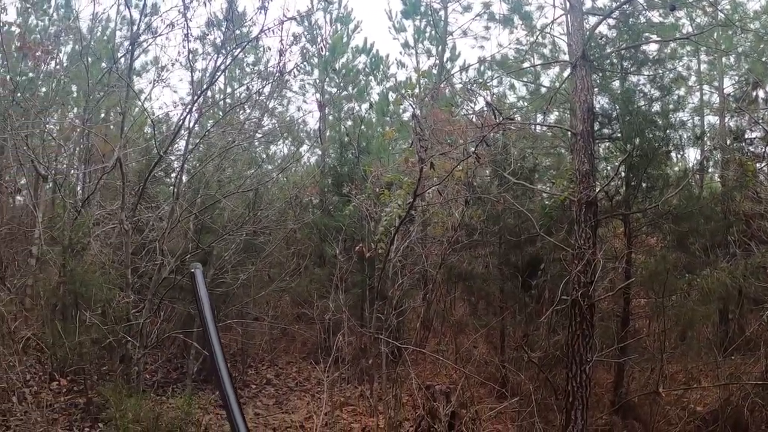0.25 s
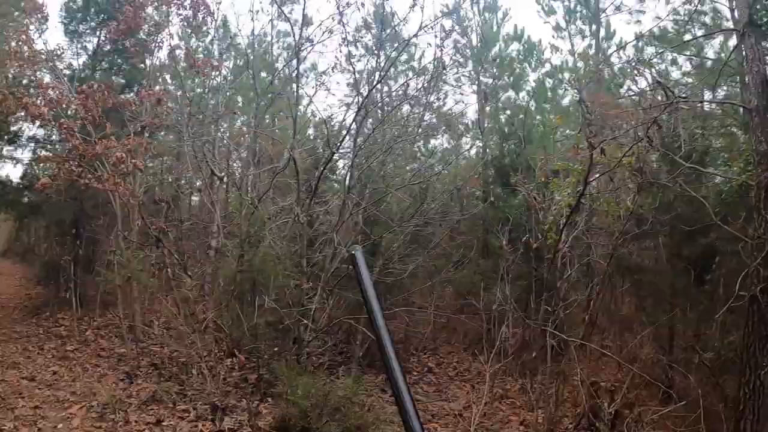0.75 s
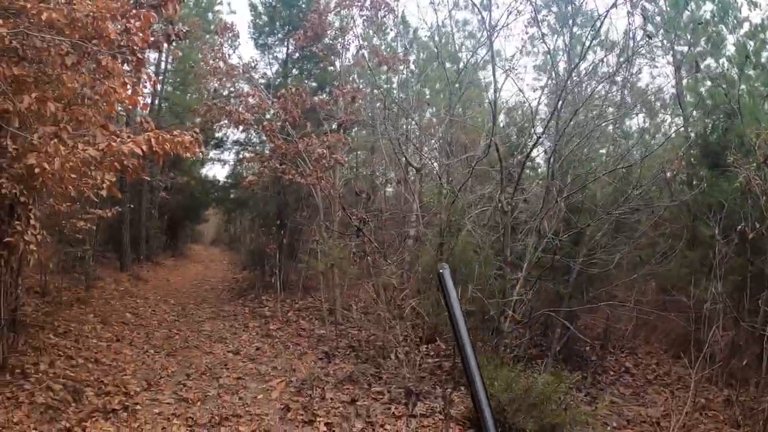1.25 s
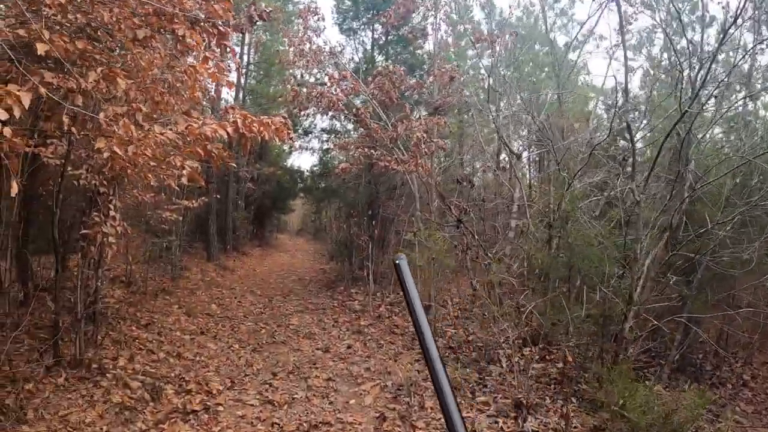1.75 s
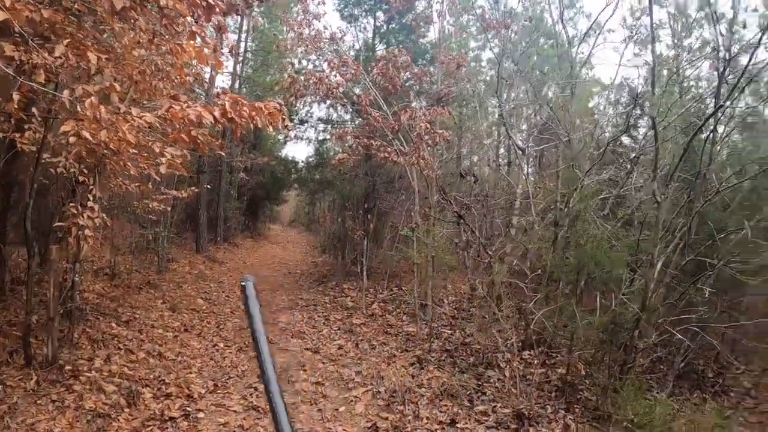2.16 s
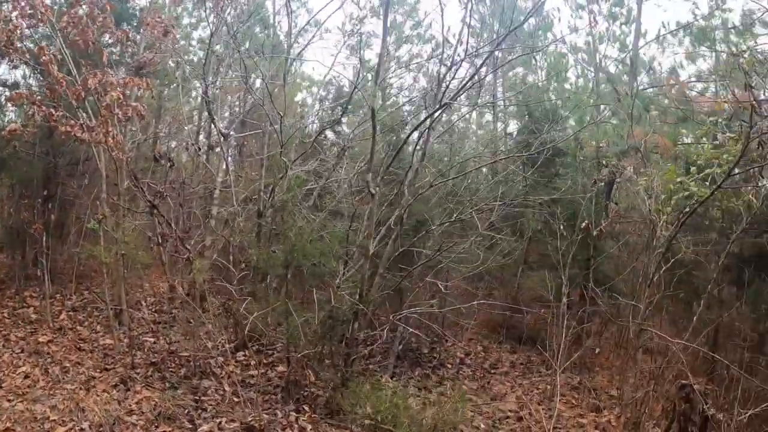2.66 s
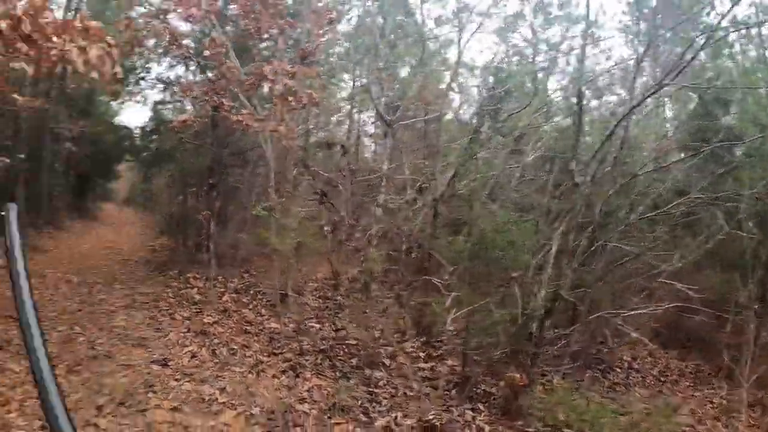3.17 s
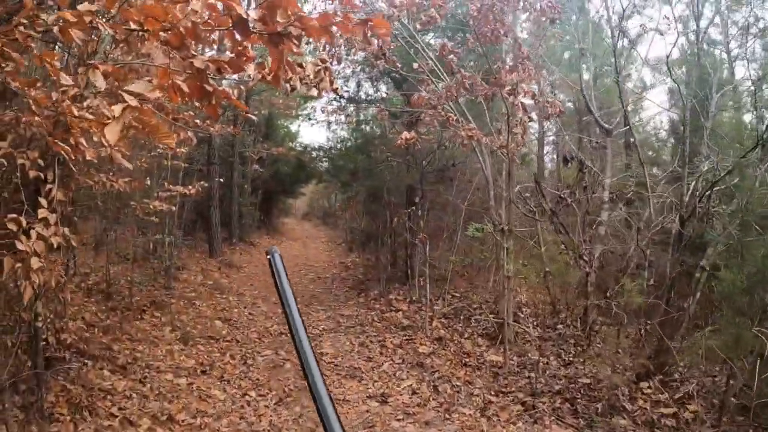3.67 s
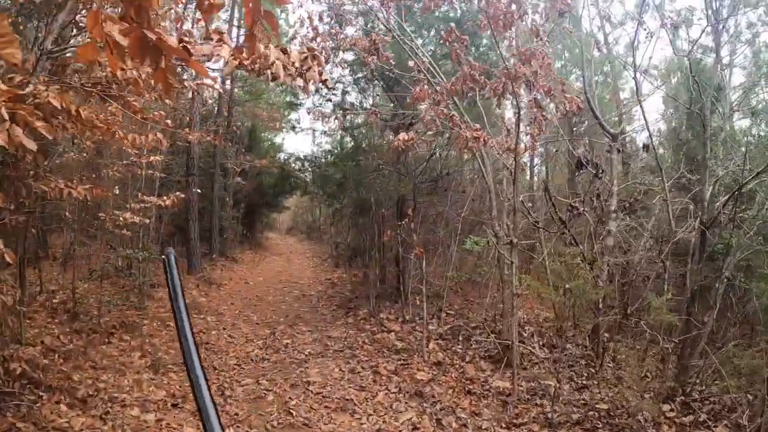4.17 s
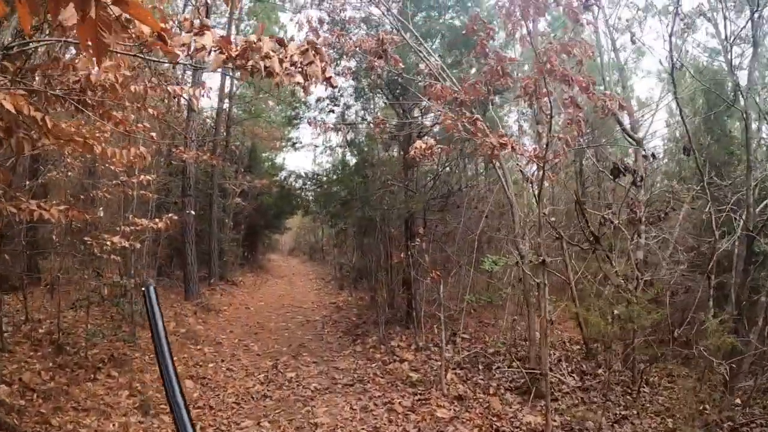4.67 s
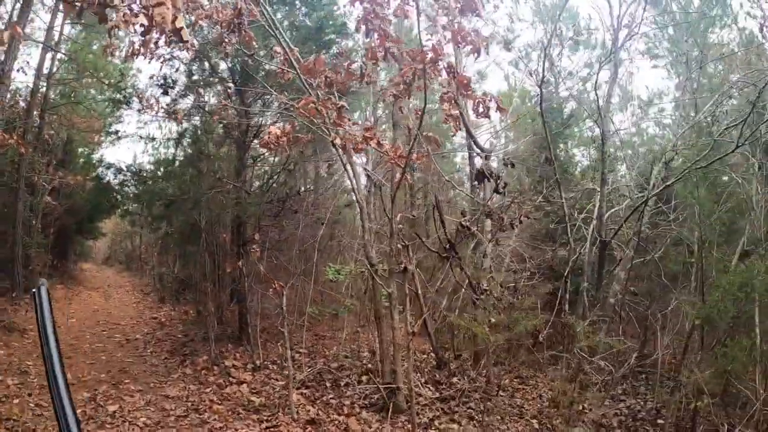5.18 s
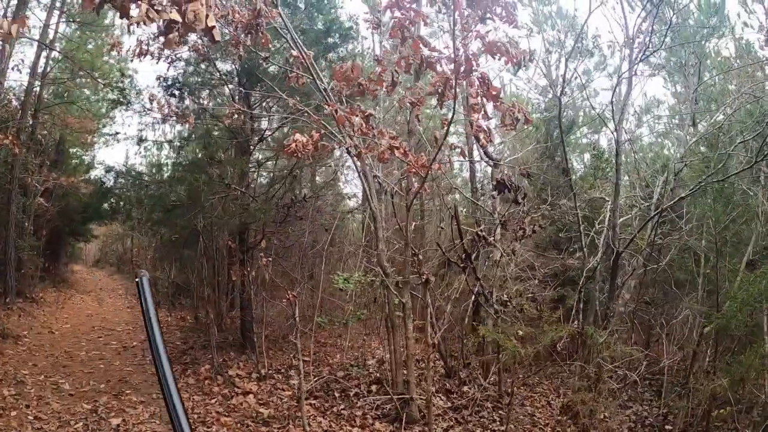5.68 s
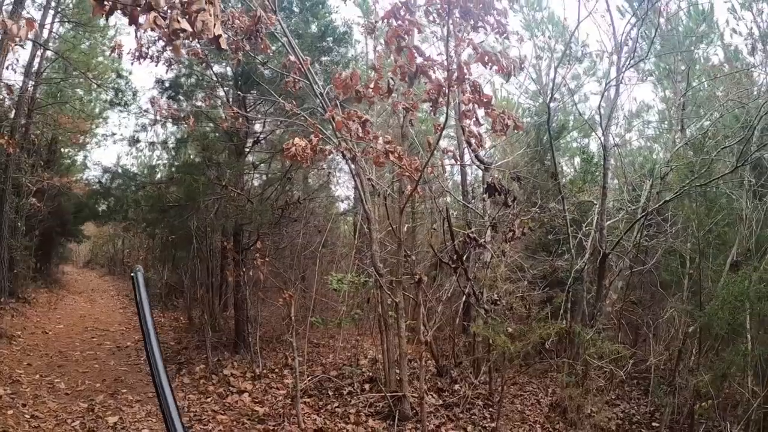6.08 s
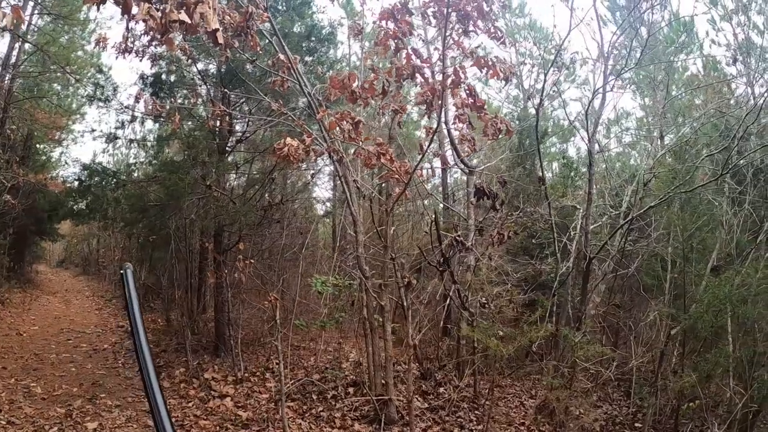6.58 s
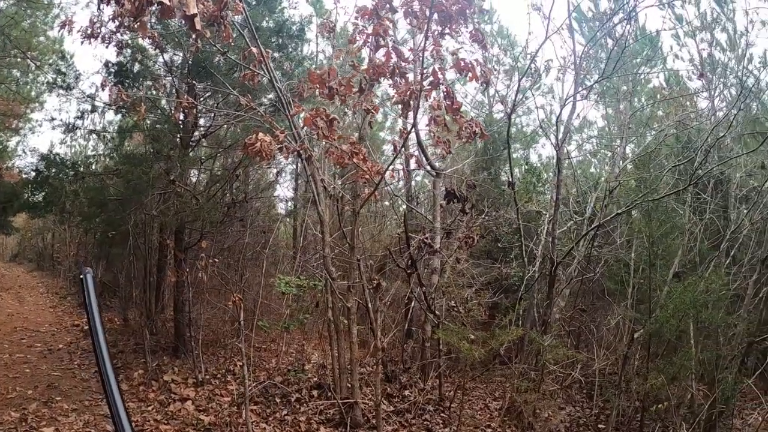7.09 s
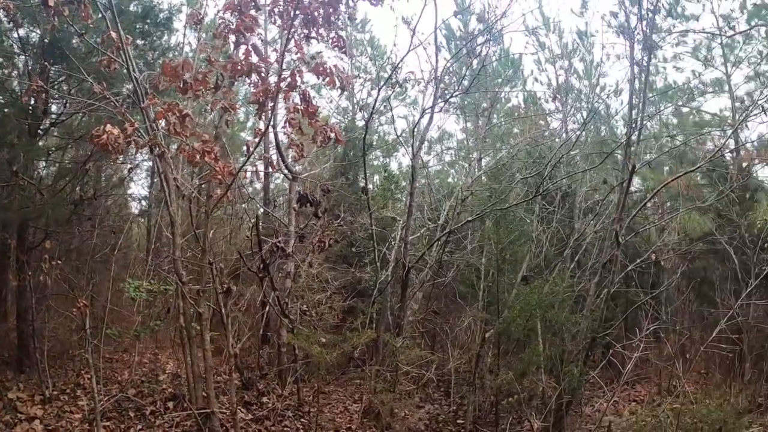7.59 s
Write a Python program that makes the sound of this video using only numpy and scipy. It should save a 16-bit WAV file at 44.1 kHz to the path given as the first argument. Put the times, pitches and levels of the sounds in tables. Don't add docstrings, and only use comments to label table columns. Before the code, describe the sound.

A pack of hounds yelps, barks and bays in quick overlapping bursts off in echoing woods, with leaf rustle and twig ticks close by.

```python
import sys
import numpy as np
from scipy import signal
from scipy.io import wavfile

SR = 44100
rng = np.random.default_rng(int(sys.argv[2]) if len(sys.argv) > 2 else 0)


def to_wav(sig):
    pcm = np.clip(np.atleast_2d(sig), -1, 1) * 32767
    pcm = np.round(pcm).astype(np.int16)
    wavfile.write(sys.argv[1], SR, pcm.T)


def invert_db(x):
    u = np.asarray(x, float) / 20
    return 10 ** u


N = 345744

# [f/Hz, level/dB]
BAY_THROAT = [(600, -1), (1250, -9.5), (1900, -11), (2500, -27), (3100, -46.5), (4300, -53.5), (8000, -56)]


def pack():
    # [t/s, yelps/dB, barks/dB, bays/dB]
    sight = [(0, 4.5, 0, -1.5), (0.997, 3, -3.5, 2.5), (2.499, 1.5, 2.5, 1), (3.498, -5, -10, 4.5),
             (5.002, -5, -9.5, -7), (6.498, -3, -7, -1), (6.801, -4.5, 7.5, 6.5), (7.149, -2.5, -10, -0.5),
             (7.6, -1, -13, -0.5)]
    # [t/s, yelps/dB, barks/dB, bays/dB]
    facing = [(.1, -24, 0.5, -2), (.16, -22, 0.5, 0), (.3, -7.5, 3, 5), (.43, -6.5, -9, -1.5),
              (.75, -9.5, -5, 3), (.9, -6, -1, -0.5), (1.2, -14, -5, 1.5), (1.32, -12, -3, 4.5),
              (1.52, -13, -4, 4.5), (1.8, -2, -2.5, 4), (2.197, 0, -10.5, -2), (2.232, -0.5, -8.5, 4),
              (2.5, 0.5, -12.5, 0), (2.522, 3.5, -11, -6.5), (2.915, 9.5, 3, -2.5), (2.936, -13, 3, -0.5),
              (2.96, 20.5, -0.5, -5), (3.4, 2.5, 2.5, 5.5), (3.87, 6, 0, 14), (4.148, -7, -1.5, 1.5),
              (4.503, 2.5, -5.5, -4), (5.099, -10, 1.5, 0), (5.5, 1.5, 2, 5), (5.899, -16.5, 7, 11.5),
              (6.2, -3, 2.5, -0.5), (6.452, -17, -10.5, 1.5), (6.65, -3, -3, 3), (6.691, -5.5, 2, 5),
              (6.86, -8.5, 4, -11), (7.114, 5, 0, 18.5), (7.19, -0.5, 0, 21), (7.604, 9, 0, 11),
              (7.628, 1, 0, 11)]
    scatter_db, lead_s = -2, 0.27
    lead = round(lead_s * SR)
    direct, paths = np.zeros((2, N + lead)), np.zeros((4, N + lead))
    sight_s, *sights_db = np.transpose(sight)
    facing_s, *lifts_db = np.transpose(facing)
    voices = [(yelps(), 0), (barks(), 1), (bays(), 2), (hoarse_bays(), 2), (long_barks(), 1)]
    for (calls, pan_db, voice), column in voices:
        for k, (s, *shape) in enumerate(sorted(calls)):
            sound = cry(*shape, lift_db=np.interp(s, facing_s, lifts_db[column]), **voice)
            direct_gain = invert_db(np.interp(s, sight_s, sights_db[column])) * sides(pan_db)[:, None]
            add(direct, s + lead_s, direct_gain * sound)
            add(paths[k % 4], s + lead_s, sound)
    scatter = invert_db(scatter_db) * sides(-1.1)[:, None] * sum(woods(p) for p in paths)
    both = (direct + scatter)[:, lead:]
    both = signal.sosfilt(signal.butter(6, 500, "high", fs=SR, output="sos"), both)
    return np.array([np.roll(both[0], 3), both[1]])


def yelps():
    # [t/s, length/s, held f/Hz, effort/dB, last/held pitch]
    swoops = [
        (-.2, 0.13, 1613, -31, 0.63),
        (0.134, 0.1, 1501, -32, 0.82),
        (0.159, 0.095, 1638, -35, 1.0),
        (0.426, 0.11, 1601, -24.5, 0.64),
        (0.883, 0.1, 1652, -22, 0.61),
        (1.309, 0.09, 1436, -29, 0.89),
        (1.756, .1, 1559, -26, 0.78),
        (3.863, .115, 1579, -29, 0.8),
        (4.147, 0.092, 1578, -25.5, 0.97),
        (7.113, 0.1, 1391, -34, 0.73),
    ]
    # [t/s, length/s, held f/Hz, effort/dB, last/held pitch]
    level = [(1.332, .08, 1689, -37.5, 0.8), (2.522, .1, 1636, -23, 0.64), (2.955, .1, 1625, -25, 0.77),
             (3.416, 0.093, 1468, -37, 0.69), (4.233, 0.054, 1418, -40.5, 0.79),
             (4.449, 0.0863, 1573, -28, 0.94), (4.889, .09, 1571, -27, 0.69), (5.159, 0.0845, 1500, -26, 1),
             (5.189, 0.074, 1287, -41, 0.9), (5.498, .1, 1529, -29.5, 0.55),
             (5.837, 0.11, 1340, -38.5, 0.57), (6.173, 0.075, 1536, -30, 0.82),
             (6.205, 0.055, 1290, -36, 0.55), (6.498, .09, 1427, -35, 0.74),
             (7.627, .078, 1517, -30.5, 0.66)]
    # [t/s, length/s, held f/Hz, effort/dB, last/held pitch]
    jumps = [
        (2.231, .078, 1609, -27, 0.53),
        (2.303, .055, 1584, -26.5, 0.78),
        (7.19, .06, 1321, -32.5, 1),
    ]
    # [t/s, length/s, held f/Hz, effort/dB]
    catches = [
        (2.194, 0.034, 1332, -31),
        (2.5, 0.04, 1227, -35.5),
        (2.916, .03, 981, -43),
        (2.936, .034, 1345, -31),
        (4.42, 0.038, 1328, -33),
        (4.87, .032, 1323, -31.5),
        (6.8, 0.043, 1365, -35),
        (7.603, 0.049, 1276, -41.5),
    ]
    # [f/Hz, level/dB]
    throat = [(900, 10.5), (1600, -1), (2200, -4.5), (2680, -13), (2950, -26.5), (3250, -36), (4000, -36),
              (4800, -44), (7000, -73.5)]
    calls = [(*c, .67) for c in swoops] + [(*c, .88) for c in level] + [(*c, 0.93) for c in jumps]
    calls += ends(catches, first=.82, last=1.7)
    return calls, -1.6, dict(throat=throat, rise=.39, fall=.25, rough=.17, half_db=-24, dull_db=8.5)


def barks():
    # [t/s, length/s, held f/Hz, effort/dB, last/held pitch]
    falling = [(-.1, 0.07, 1089, -35.5, .86), (0.279, .065, 1118, -24.5, 0.81),
               (0.748, 0.057, 1089, -25, 0.85), (1.172, 0.031, 1071, -32, 0.85),
               (1.515, 0.064, 1100, -27.5, 0.87), (1.957, 0.054, 1091, -30.5, 0.93),
               (2.968, 0.044, 1065, -29, 0.87), (3.372, 0.069, 1054, -33, 0.88),
               (4.075, .07, 1131, -28.5, .84), (4.537, 0.047, 1108, -27, 0.9),
               (5.05, 0.038, 1125, -28.5, 0.89), (5.46, 0.06, 1080, -30, 0.87),
               (6.188, 0.053, 1075, -28.5, 0.87)]
    # [t/s, length/s, held f/Hz, effort/dB]
    yaps = [
        (.5, 0.092, 1172, -35),
        (1.02, 0.04, 1063, -31),
        (1.11, 0.065, 1189, -35.5),
        (1.43, 0.033, 994, -31.5),
        (1.87, 0.028, 994, -35),
        (1.97, 0.053, 1249, -30),
        (2.45, 0.057, 1093, -30.5),
        (6.44, 0.038, 1168, -28),
    ]
    # [f/Hz, level/dB]
    throat = [(850, 5.5), (1100, 0), (2000, -3.5), (2300, -9), (3200, -34.5), (4200, -43), (5200, -56),
              (6200, -55), (7500, -65)]
    calls = [(*c, 1.05) for c in falling] + ends(yaps, first=0.79, last=1.02)
    return calls, -1.1, dict(throat=throat, rise=.4, fall=.8, rough=.17, half_db=-29, dull_db=1.5)


def bays():
    # [t/s, length/s, held f/Hz, effort/dB]
    sagging = [
        (-.05, 0.12, 667, -38.5),
        (.35, 0.056, 637.5, -35.5),
        (1.19, 0.079, 659, -37.5),
        (1.58, 0.083, 659.6, -35),
        (2.04, 0.087, 650.7, -35.5),
        (2.6, 0.077, 882, -38.5),
        (4.13, 0.14, 595.3, -41.5),
        (6.22, .15, 596.8, -33.5),
    ]
    # [t/s, length/s, held f/Hz, effort/dB]
    drones = [(.7, 0.082, 611, -53), (1.07, 0.077, 570, -44), (3, 0.18, 638.3, -40),
              (3.43, .15, 622.7, -43.5), (5.08, 0.18, 631.2, -39), (5.5, 0.16, 630, -41.5),
              (5.69, 0.13, 622, -49), (6.69, 0.131, 612, -34.5), (6.855, 0.085, 608, -33.5),
              (7.01, 0.029, 622, -53), (7.13, 0.1, 647.4, -49.5)]
    calls = ends(sagging, first=1.03, last=0.885) + ends(drones, first=1.01, last=0.97)
    return calls, -1.2, dict(throat=BAY_THROAT, rise=.3, fall=.5, rough=.12, half_db=-30, dull_db=4.5)


def hoarse_bays():
    # [t/s, length/s, held f/Hz, effort/dB]
    falling = [
        (-.08, 0.057, 843, -39.5),
        (.345, 0.055, 840, -37),
        (4.14, 0.13, 877, -52),
        (.795, 0.091, 747, -33.5),
        (1.99, 0.074, 703.6, -34),
        (4.57, 0.12, 721.4, -33),
    ]
    # [t/s, length/s, held f/Hz, effort/dB]
    howls = [
        (1.07, 0.1, 890, -39.5),
        (2.495, .11, 789, -33),
        (6.485, .062, 847, -33.5),
    ]
    calls = ends(falling, first=1.09, last=0.832) + ends(howls, first=.85, last=0.79)
    return calls, -1.3, dict(throat=BAY_THROAT, rise=.35, fall=.5, rough=.4, half_db=-27, dull_db=4.5)


def long_barks():
    # [t/s, length/s, held f/Hz, effort/dB]
    level = [
        (6.62, 0.072, 1091, -42.5),
        (6.652, 0.1196, 1035, -37),
    ]
    # [f/Hz, level/dB]
    throat = [(1000, 0), (2080, 4), (2300, -9), (3100, -24.5), (4200, -27), (5150, -31), (6200, -24.5),
              (7500, -50)]
    calls = ends(level, first=0.97, last=0.95)
    return calls, -1.1, dict(throat=throat, rise=.3, fall=.7, rough=.2, half_db=-26, dull_db=1.5)


def ends(calls, first, last):
    return [(*c, last, first) for c in calls]


def cry(length_s, held_hz, db, last, first, throat, rise, fall, rough, half_db, dull_db, lift_db):
    u = np.arange(0, length_s, 1 / SR) / length_s
    onset = np.clip(1 - u / rise, 0, 1) ** 1.536
    drop = np.clip(1 - (1 - u) / fall, 0, 1) ** 2
    hz = held_hz * (1 + (first - 1) * onset + (last - 1) * drop)
    jitter_hz = 12 * wander(len(u), 30) + hz * rough * .045 * wander(len(u), 180)
    turns = np.cumsum(hz + jitter_hz) / SR
    closing_db = dull_db * (.45 - u) + 2.0 * wander(len(u), 16)
    rates, starts = rng.random((2, 8, 1))
    flicker_hz = 21.8 * (.5 + rates)
    flicker_db = 4.0 * np.cos(2 * np.pi * (flicker_hz * u * length_s + starts))
    tone = np.zeros(len(u))
    for k in range(1, 8):
        level_db = read(throat, k * hz)
        if k == 2:
            level_db = level_db + flicker_db[k] + lift_db + closing_db
        elif k > 2:
            level_db = level_db + flicker_db[k] + 0.87 * lift_db - 0.66 * closing_db
        tone += invert_db(level_db) * np.cos(2 * np.pi * k * turns)
    half_line = invert_db(half_db) * np.cos(np.pi * turns)
    tone = tone * (1 + rough * wander(len(u), 170) + half_line)
    swell = np.sin(np.pi / 2 * np.clip(u / .28, 0, 1)) ** 2 * np.clip((1 - u) / .15, 0, 1)
    return np.sqrt(2) * invert_db(db) * tone * swell


def woods(x):
    # [f/Hz, t60/s]
    trunks = [(400, 3.1), (800, 1.53), (1500, 1.566), (2500, 0.92), (4000, 0.64), (8000, 0.63)]
    t = np.arange(2 * SR) / SR
    echoes = rng.choice([-1., 1.], (2, len(t))) * (rng.random((2, len(t))) < 2500 / SR)
    echoes *= np.clip(t / 0.0072, 0, 1) * invert_db(1.1 * wander(len(t), 30))
    tail = coloured(echoes, lambda hz, s: invert_db(-60 * s / read(trunks, hz)), size=256)
    tail = tail / np.linalg.norm(tail[0])
    scattered = signal.fftconvolve(x[None], tail, axes=1)[:, :len(x)]
    return scattered * invert_db(1.44 * wander(len(x), 33))


def rustle():
    # [t/s, hold/s, level/dB, left-right/dB]
    brushes = [(.92, 0.012, -64.5, 6), (1.22, .03, -83, -8), (1.51, 0.05, -50.5, 2.5),
               (1.9, 0.0027, -56, 4), (2.27, 0.02, -65, 8.5), (2.51, 0.068, -49, 3.5),
               (2.75, 0.0056, -56, 5), (3.45, .15, -57.5, 4), (4.235, .06, -48.5, 3),
               (4.45, 0.0055, -59, 3.5), (4.93, 0.26, -49, 3.5), (5.74, 0.0037, -54, 6),
               (5.82, 0.36, -60.5, 6.5), (6.09, 0.0039, -69, -2.5), (6.375, 0.018, -52, 2),
               (6.72, .1, -67.5, 6.5), (7.69, 0.0076, -71, 0)]
    # [t/s, hold/s, level/dB, left-right/dB]
    flicks = [
        (2.88, 0.086, -62, 4.5),
        (3.75, 0.0038, -65.5, 7.5),
        (3.97, 0.027, -56, 1.5),
        (4.85, 0.004, -86, -4),
        (5.48, 0.012, -55, 0),
        (5.52, 0.0013, -52.5, 1.5),
        (6.92, .005, -65.5, 7.5),
    ]
    # [t/s, level/dB]
    fidget = [(0, -92.5), (.7, -78.5), (1.3, -71), (2.1, -68.5), (3.299, -67), (3.9, -67.5), (4.7, -70.5),
              (6.2, -67), (7.052, -79), (7.84, -82.5)]
    # [f/Hz, level/dB]
    rustle_colour = [(300, -5), (1500, 13.5), (3000, 2.5), (4500, 3), (5800, -1), (7500, 0), (8400, -11),
                     (12000, -23.5), (15000, -40.5)]
    t = np.arange(N) / SR
    bed = invert_db(np.interp(t, *np.transpose(fidget))) * sides(3.2)[:, None]
    brushing = bursts(brushes, rise_db_s=399, fall_db_s=100)
    flicking = bursts(flicks, rise_db_s=503, fall_db_s=603)
    moving = np.sqrt(bed ** 2 + brushing + flicking)
    top_db = 0.37 * (20 * np.log10(moving[0]) + 56)

    def colour(hz, s):
        octaves = np.log2(np.maximum(hz / 7500, 1))
        return invert_db(read(rustle_colour, hz) + np.interp(s, t, top_db) * octaves)

    crackle_t60_s = 0.013
    snaps = invert_db(4.3 * np.minimum(rng.exponential(1, N), 5)) * (rng.random(N) < 400 / SR)
    trails = signal.lfilter([1], [1, -invert_db(-60 / (crackle_t60_s * SR))], snaps)
    crackle = rng.standard_normal((2, N)) * trails
    scrape = rng.standard_normal((2, N))
    rub = (.5 * evened(crackle) + scrape) * invert_db(1.8 * wander(N, 21))
    return evened(coloured(rub, colour, size=256)) * invert_db(6.5) * moving


def ticks():
    # [t/s, peak/dB, f/Hz, left-right/dB]
    twigs = [(2.391, -59.5, 4630, 8), (2.8774, -45, 4220, 1), (2.891, -37.5, 4960, 3.5),
             (2.913, -43, 2300, -3.5), (2.933, -49.5, 3560, -12), (3.7432, -43, 7600, 9),
             (3.508, -47, 3800, -1), (3.842, -49.5, 2810, -3), (3.947, -50.5, 4765, 0),
             (3.9775, -26, 3420, 3.5), (4.4418, -53, 4950, 3.5), (4.8371, -51.5, 7400, 11),
             (4.8449, -45.5, 4250, 5.5), (5.0936, -31.5, 4125, -1), (5.512, -39.5, 3800, 4.5),
             (5.5872, -56, 3500, -10), (5.5898, -43, 5200, -3), (5.6917, -37, 7050, -8.5),
             (6.9055, -48, 7300, 11.5)]
    # [t/s, peak/dB, f/Hz, t60/s]
    knock = (5.474, -29, 800, .02)
    out, t = np.zeros((2, N)), np.arange(800) / SR
    for s, db, hz, pan_db in twigs:
        ring = np.sin(2 * np.pi * hz * t)
        snap = invert_db(-60 * t / 0.0044) * (ring + 1.5 * rng.standard_normal((2, len(t))))
        snap = snap + invert_db(-22.5 - 60 * t / 0.023) * rng.standard_normal((2, len(t)))
        add(out, s, invert_db(db) * sides(pan_db)[:, None] * snap)
    s, db, hz, t60_s = knock
    band = signal.butter(3, [400, 2000], "band", fs=SR)
    thud = np.sin(2 * np.pi * hz * t) + 4 * signal.lfilter(*band, rng.standard_normal(len(t)))
    add(out, s, invert_db(db - 60 * t / t60_s) * thud)
    return signal.lfilter(*signal.butter(2, 8500, fs=SR), out)


def wind():
    # [t/s, hold/s, level/dB]
    gust_rows = [(0.058, 0.011, -70), (0.347, 0.11, -65.5), (.7, 0.11, -69.5), (0.896, 0.033, -64.5),
                 (1.047, 0.21, -84), (1.821, 0.012, -61), (1.963, .01, -68), (2.254, 0.13, -72.5),
                 (2.483, 0.15, -53.5), (2.753, 0.09, -68), (3.244, 0.12, -61.5), (3.41, 0.22, -51),
                 (3.72, 0.14, -75), (4.262, 0.12, -44.5), (5.128, 0.066, -57), (5.522, 0.045, -67),
                 (5.97, 0.028, -58.5), (6.404, 0.026, -69), (7.05, 0.3, -69), (7.435, .01, -69),
                 (7.708, 0.027, -65.5)]
    # [f/Hz, level/dB]
    wind_colour = [(15, -6), (45, 1), (80, -16.5), (150, -18), (400, -38), (1200, -93)]
    lull_db, pan_db = -74, 0.5
    gusts = bursts([(*g, pan_db) for g in gust_rows], rise_db_s=300, fall_db_s=173.5)
    lumps = invert_db(4.9 * np.array([wander(N, 28), wander(N, 16)]))
    noise = coloured(rng.standard_normal((2, N)), lambda hz, s: invert_db(read(wind_colour, hz)), size=4096)
    return evened(noise) * np.sqrt(invert_db(lull_db) ** 2 + gusts) * lumps


def air():
    # [f/Hz, level/dB]
    air_colour = [(25, -5.5), (90, -7.5), (160, 7), (250, 3), (420, -5), (1500, -2), (4000, -21.5),
                  (7700, -28), (8500, -45), (15000, -65.5)]
    hush = coloured(rng.standard_normal((2, N)), lambda hz, s: invert_db(read(air_colour, hz)), size=2048)
    return invert_db(-59 + 1.9 * wander(N, 2.9)) * evened(hush)


def bursts(rows, rise_db_s, fall_db_s):
    t = np.arange(N) / SR
    power = np.zeros((2, N))
    for s, hold_s, db, pan_db in rows:
        rise_db = rise_db_s * np.clip(s - t, 0, 1)
        fall_db = fall_db_s * np.clip(t - s - hold_s, 0, 1)
        power += (invert_db(db - rise_db - fall_db) * sides(pan_db)[:, None]) ** 2
    return power


def coloured(x, colour, size=1024):
    # [f/Hz, left-right likeness/1]
    likeness = [(60, 0.47), (180, 0.3), (300, 0.12), (520, 0.9), (890, 0.94), (1520, 0.63), (2600, 0.26),
                (6000, 0.34)]
    hz, t, (left, other) = signal.stft(x, SR, nperseg=size)
    same = np.clip(read(likeness, hz), 0, 1)[:, None]
    pair = np.array([left, same * left + np.sqrt(1 - same ** 2) * other])
    return signal.istft(pair * colour(hz[:, None], t), SR, nperseg=size)[1][:, :x.shape[1]]


def wander(length, hz):
    noise = rng.standard_normal(length + 2000)
    return evened(signal.lfilter(*signal.butter(2, hz, fs=SR), noise)[2000:])


def evened(x):
    return x / np.sqrt(np.mean(x ** 2) + 1e-20)


def read(points, hz):
    f, value = np.transpose(points)
    return np.interp(np.log(hz + 1), np.log(f + 1), value)


def sides(pan_db):
    return invert_db(np.array([pan_db / 2, -pan_db / 2]))


def add(mix, s, sound):
    part = mix[..., max(round(s * SR), 0):][..., :sound.shape[-1]]
    part += sound[..., :part.shape[-1]]


def scene():
    return pack() + rustle() + ticks() + wind() + air()


def top_cut(x):
    return signal.sosfilt(signal.butter(12, 15450, fs=SR, output="sos"), x)


def record(dry):
    return top_cut(dry)


dry = scene()
out = record(dry)
to_wav(out)
```